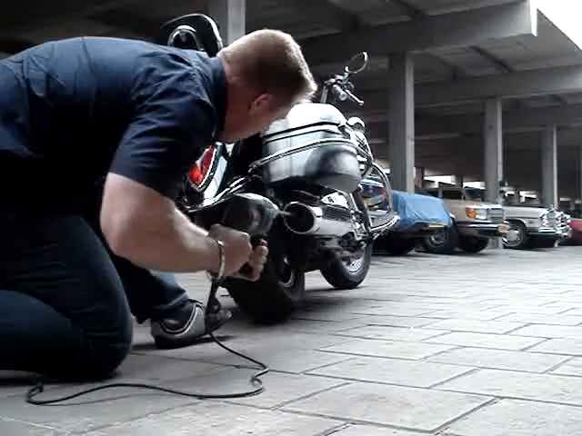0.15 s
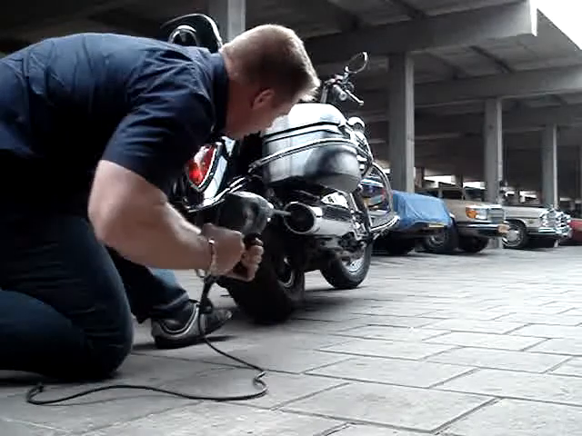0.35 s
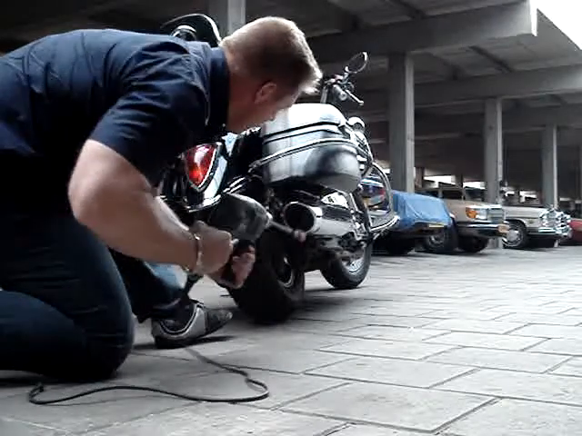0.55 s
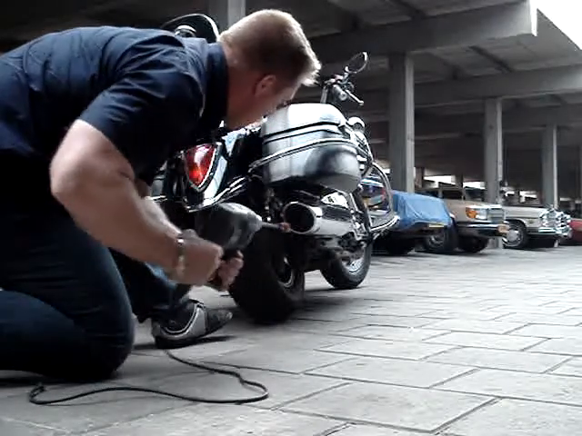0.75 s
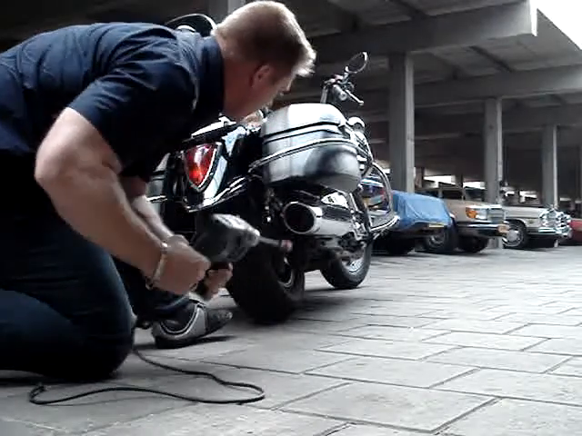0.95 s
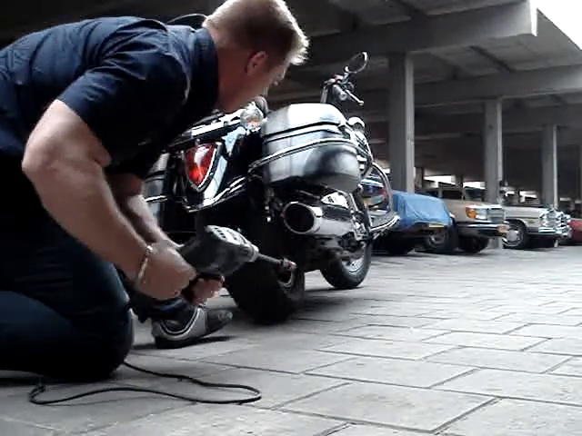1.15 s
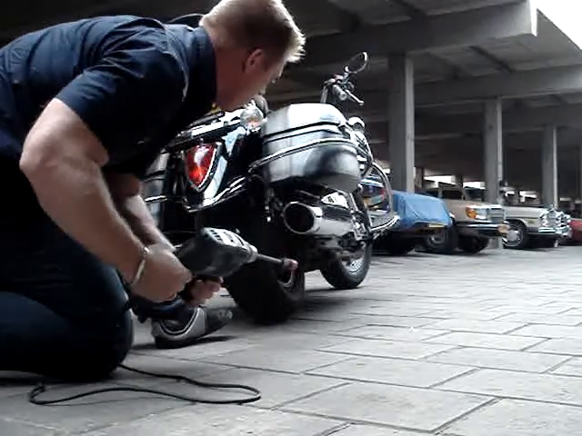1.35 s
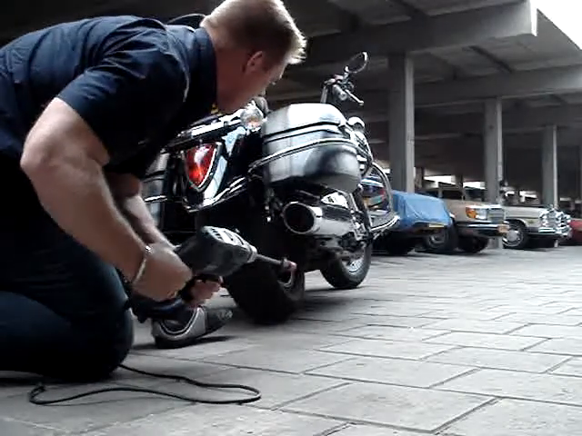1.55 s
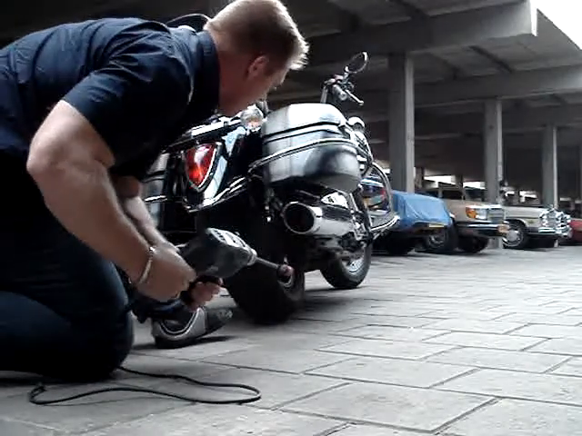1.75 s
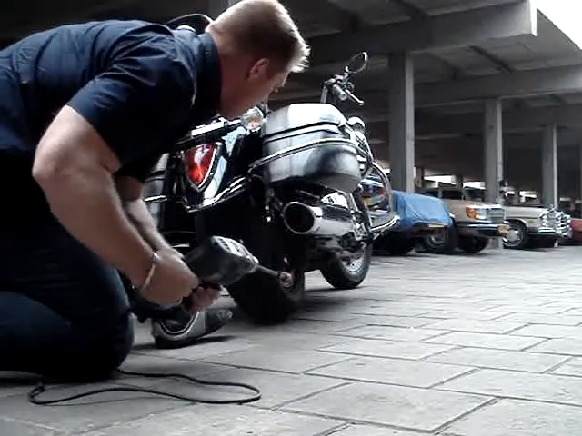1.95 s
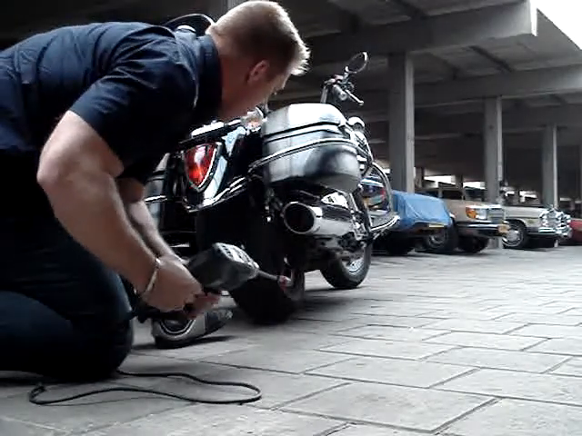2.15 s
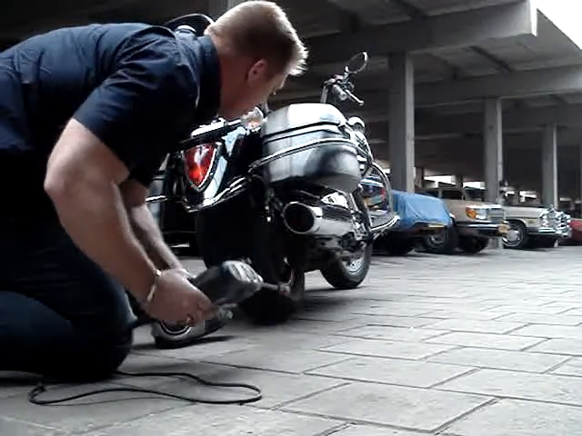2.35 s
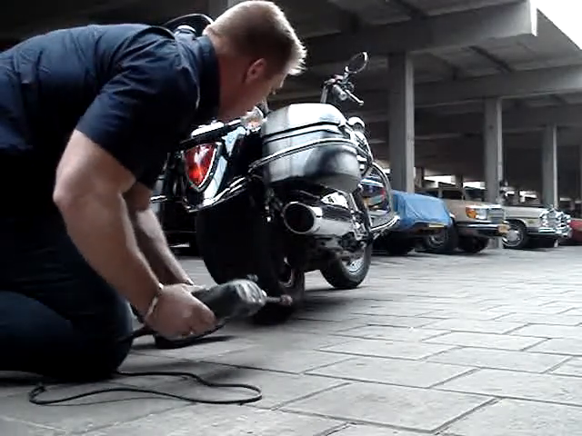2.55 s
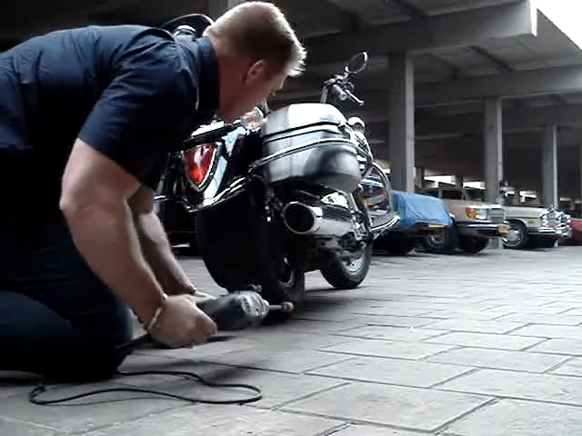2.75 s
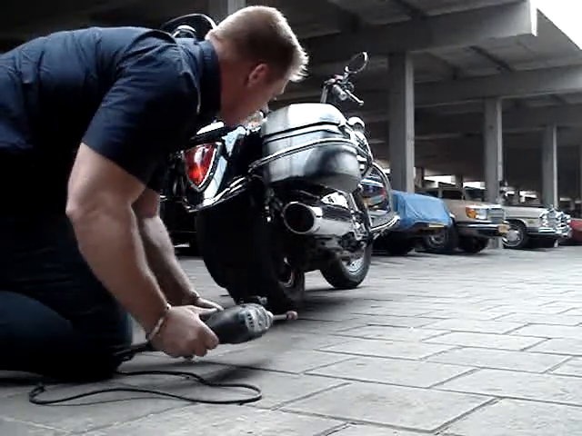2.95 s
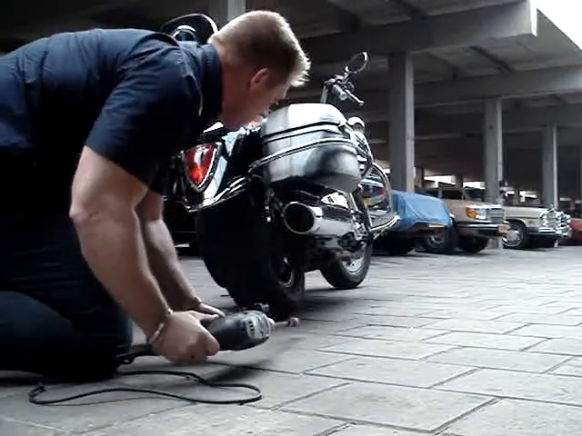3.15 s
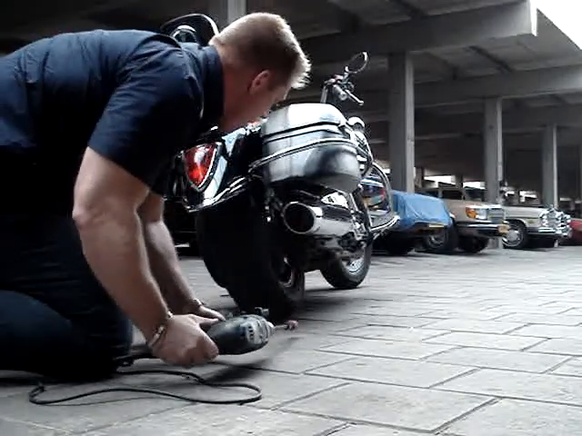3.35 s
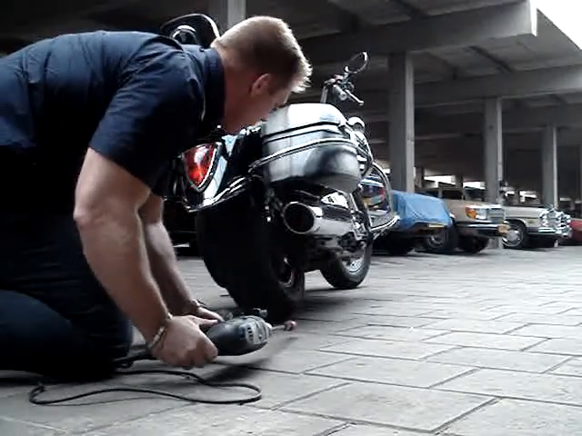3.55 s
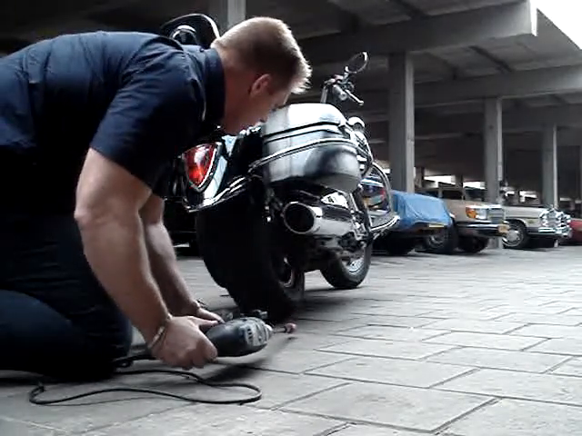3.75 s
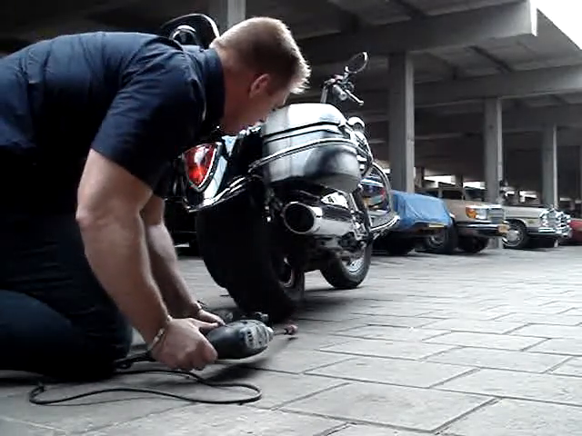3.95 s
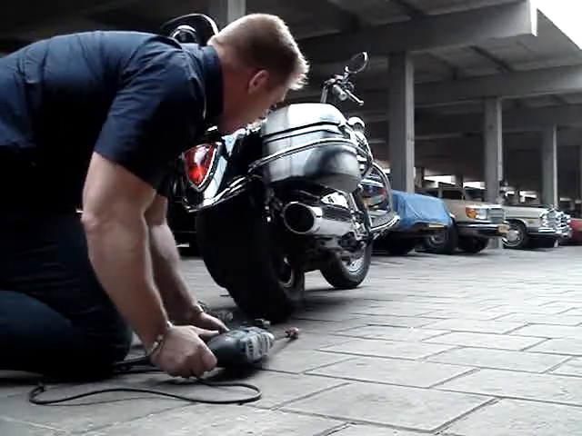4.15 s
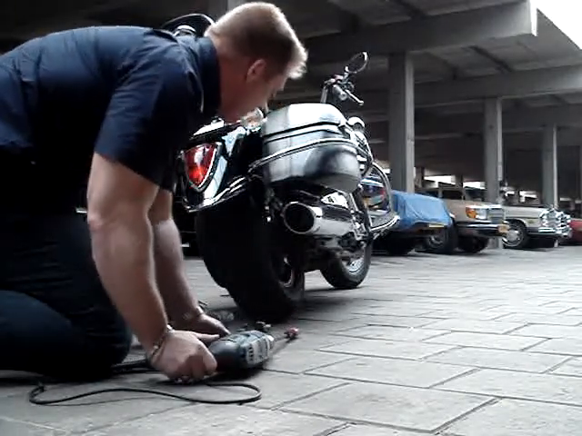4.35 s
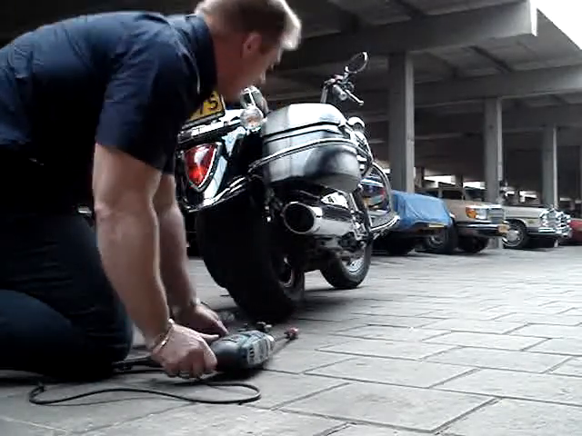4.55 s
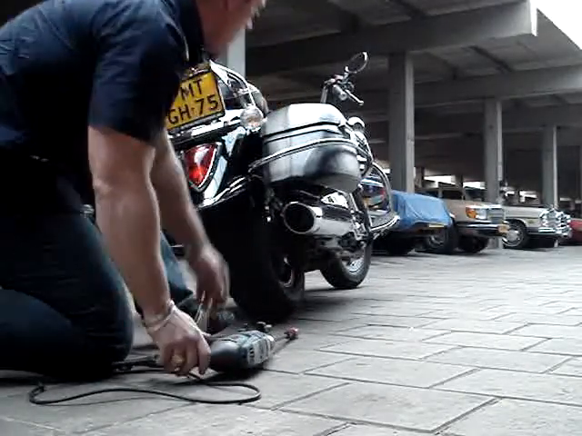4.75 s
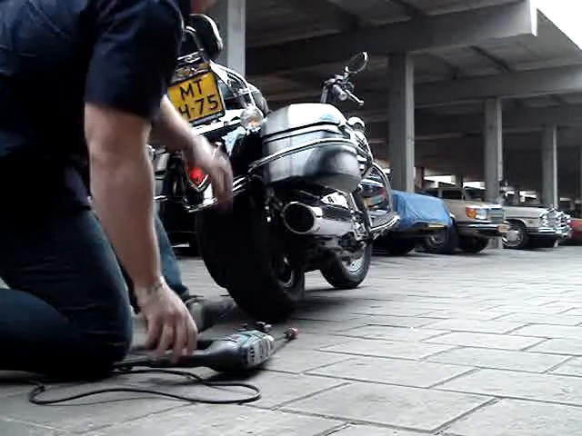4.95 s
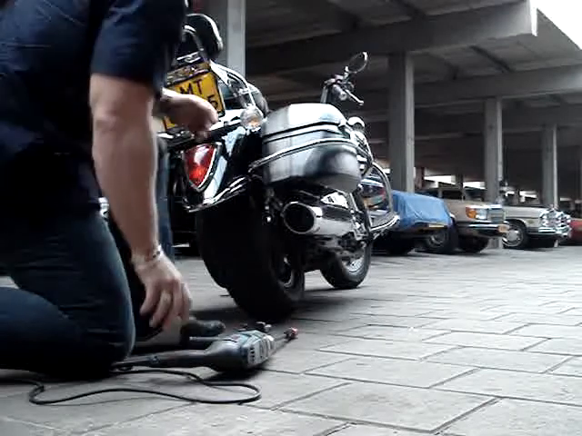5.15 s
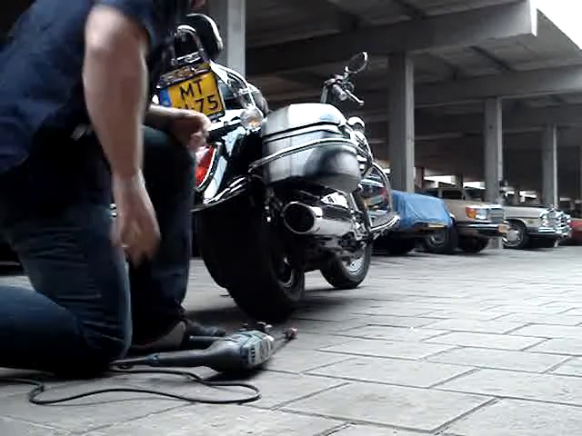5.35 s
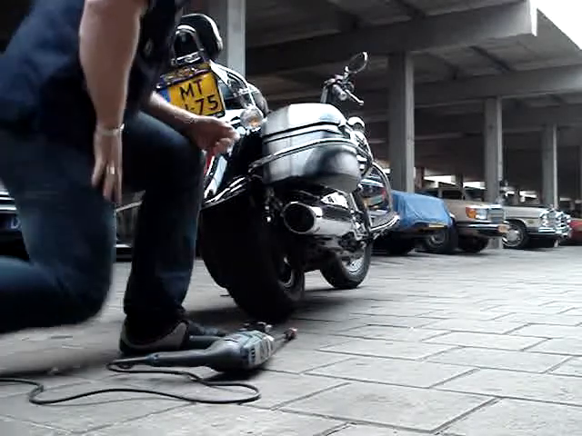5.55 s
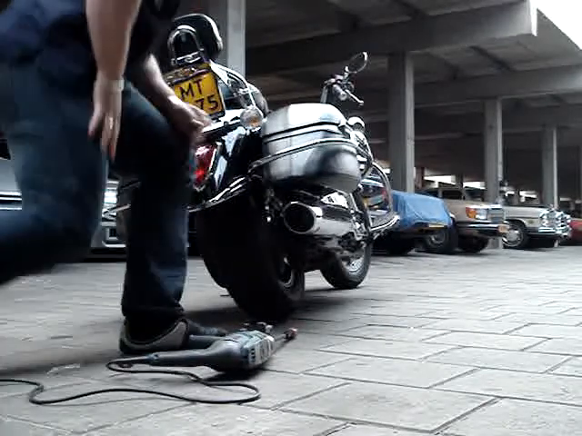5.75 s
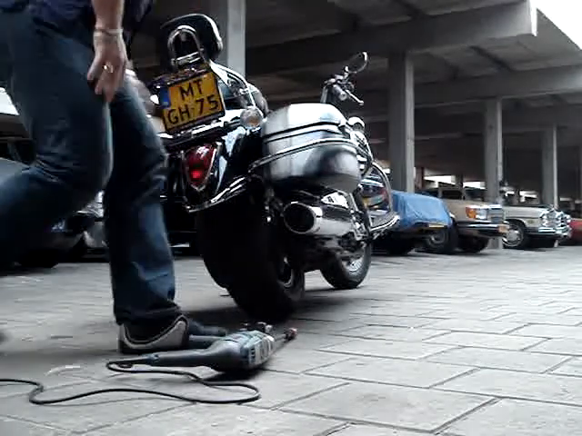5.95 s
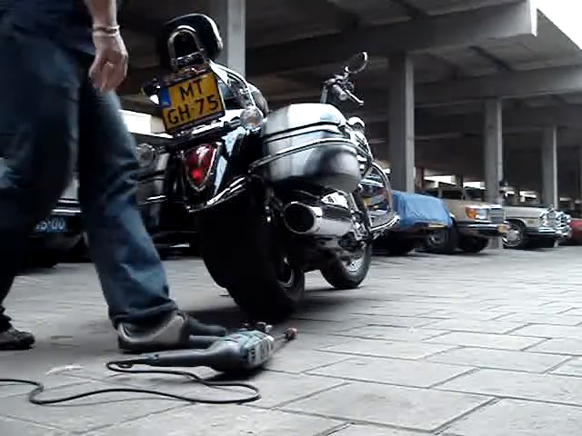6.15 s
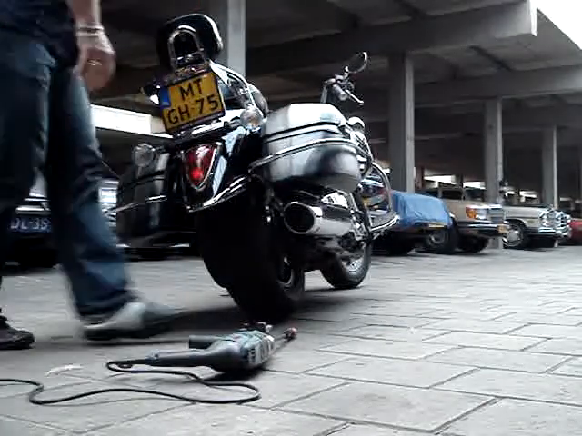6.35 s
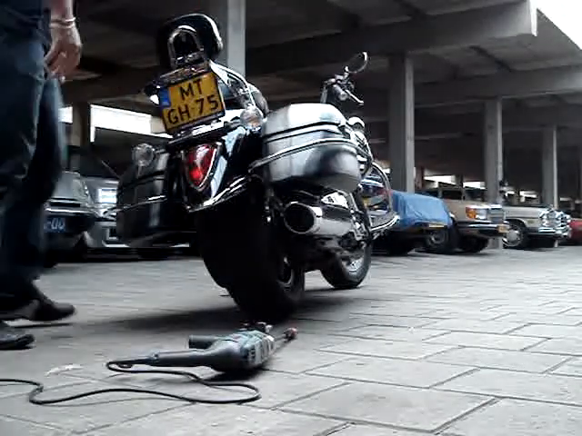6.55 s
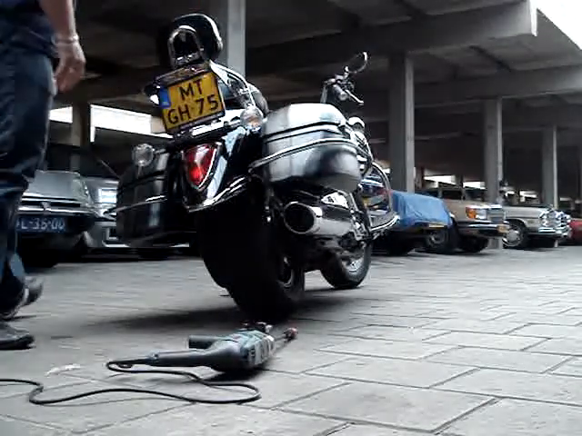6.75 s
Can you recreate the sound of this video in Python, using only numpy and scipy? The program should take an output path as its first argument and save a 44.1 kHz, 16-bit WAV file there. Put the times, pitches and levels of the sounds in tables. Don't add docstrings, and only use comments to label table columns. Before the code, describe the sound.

A loud corded drill rasps inside a steel pipe, knocks free, then whines down to a stop; it is laid on paving and shoes scuff away.

```python
import sys
import numpy as np
from scipy import signal
from scipy.fft import irfft
from scipy.io import wavfile

SR = 44100
rng = np.random.default_rng(int(sys.argv[2]) if len(sys.argv) > 2 else 0)


def unload_wav(signal):
    wavfile.write(
        sys.argv[1],
        SR,
        np.round(np.clip(np.atleast_2d(signal).T, -1, 1) * 32767).astype(np.int16),
    )


def how_loud(loudness_db):
    steps = np.asarray(loudness_db, float) / 20
    return 10 ** steps


N = 300317
T = np.arange(N) / SR

# (multiple of rotor speed, level at 200 turns per s [dB], slope [dB per doubling])
SHAFT_LINES = [(1, -56, 15.5), (6, -46, 12)]
# (multiple of rotor speed, column of FRAME_MODES, level [dB], slope [dB per doubling])
FRAME_LINES = [(24, 2, -4, 7), (36, 2, -10, 6), (48, 3, -3, 8), (72, 3, -4, 7), (96, 3, 1, 9.5),
               (120, 3, 5, 12), (39, 4, 0, 9)]
# (centre [Hz], width [Hz], bars [dB], double bars [dB], fan [dB])
FRAME_MODES = [(850, 490, -35.5, -38, -55), (1370, 470, -30, -27, -40), (1673, 260, -24, -26, -48),
               (1940, 137, -26.5, -43, -53), (2163, 500, -43.5, -24, -39), (3770, 420, -25, -56, -56),
               (4290, 270, -33, -50, -41), (4840, 670, -30, -40, -41), (5350, 330, -38, -40, -37),
               (6100, 550, -35, -46, -33.5), (6510, 280, -33, -30.5, -37.5), (7000, 750, -31, -38.5, -34.5),
               (7950, 350, -67, -65, -32.5), (8740, 1700, -60, -66, -37)]
# (multiple of rotor speed, level over the rattle [dB])
SLOT_LINES = [(12, -9), (18, -11), (30, -10), (60, -5), (84, -3), (108, -6), (132, -5), (144, -4)]
# (time [s], level [dB])
RUN_DOWN = [(0.0, -22), (0.44, -21.5), (0.65, -24.5), (1.41, -24), (2.67, -36.5), (2.82, -38), (3.08, -40),
            (3.45, -49.5), (3.68, -59.5), (3.81, -83), (3.9, -81)]
# (frequency [Hz], level [dB per Hz])
AIR_SPECTRUM = [(35, -37.5), (60, -36), (171, -22), (286, -18), (326, -18), (412, -9), (909, 0), (1690, -2),
                (2010, -3.5), (3740, -2.5), (6800, -8.5), (8980, -21.5), (10000, -37.5), (13000, -50),
                (22000, -120)]
# (centre [Hz], width [Hz], level [dB])
HOUSING_MODES = [(915, 260, -9), (1660, 240, 1), (2150, 330, -2), (2780, 360, -6), (3670, 400, -10),
                 (4980, 500, -11), (6600, 800, -10), (8900, 600, -22)]
# (centre [Hz], width [Hz], level [dB], most fed at time [s])
PIPE_MODES = [(125, 40, -19, .3), (515, 25, -4, .03), (738, 26, -1, .36), (912, 30, -2, .26),
              (1040, 40, -5, .15), (1390, 60, -2, .36), (1680, 70, -7, .12), (2409, 18, 0, .17),
              (2748, 30, -5, .29), (3208, 22, -1, .14), (3381, 30, -6, .3), (3780, 50, -5, .3),
              (4108, 40, -5, .05), (4370, 60, -4, .08), (5550, 90, -4, .39), (6350, 300, -2, .36),
              (6743, 24, 1.5, .09), (6778, 30, 0, .27), (6750, 350, -2, .15), (7200, 400, -3, .33)]
# (time [s], extra level [dB], decay [s])
SNAGS = [
    (0, 5.5, 0.071),
    (0.492, 7, 0.014),
    (.53, -3, 0.024),
]
# (time [s], blow [dB])
PIPE_BLOWS = [
    (.004, -17),
    (.49, -6.5),
    (.507, -7),
    (.53, -5),
    (.545, -32),
]
# (frequency [Hz], level [dB], t60 [s])
PIPE_RING = [(554.5, -12.5, 0.22), (977, -26, 0.27), (2080, -15, 0.076), (2410, -18.5, 1), (3070, -7, 0.03),
             (4080, -8.5, 0.057)]
# (time [s], peak [dB], centre [Hz], breadth [octaves], t60 [s])
KNOCKS = [(3.972, -44, 1890, 0.32, 0.027), (4.132, -37, 1170, 1.05, 0.038),
          (4.272, -40.5, 900, 0.99, 0.033), (4.322, -30, 280, 0.73, 0.015),
          (4.3235, -24.5, 850, 1.87, 0.026), (4.438, -38, 750, 1.6, .04), (5.091, -26, 1020, 0.74, 0.046),
          (5.250, -33, 4400, 0.35, 0.0067), (5.425, -31.5, 3500, 0.56, 0.04), (5.997, -44, 1200, 0.9, .02),
          (6.069, -34, 1090, 0.67, .01), (6.106, -29, 517, 0.65, 0.06), (6.215, -36, 4500, 0.51, .008),
          (6.24, -34, 2800, 0.48, 0.013), (6.417, -35.5, 3920, 0.46, 0.0077)]
# (time [s], blow [dB])
LAID_BLOWS = [
    (4.321, -31),
    (4.345, -53),
    (4.362, -45),
    (4.376, -46),
    (4.393, -45),
    (4.408, -44),
    (4.424, -57),
    (4.44, -42.5),
]
# (frequency [Hz], level [dB], t60 [s])
BODY_RING = [(280, -23, 0.086), (622, -18, 0.075), (870, 0, 0.02), (950, -22, 0.041), (1460, -11.5, 0.033),
             (1900, -25, .08), (5640, -31, 0.19)]
# (start time [s], rise [s], fall [s], peak [dB], tilt: bright half up, dull
# half down [dB])
SCUFFS = [
    (3.05, 0.047, 0.055, -36.5, 7),
    (4.33, 0.0035, 0.12, -48.5, -10),
    (4.438, 0.0042, 0.049, -44.5, -6),
    (5.093, .012, 0.11, -33, -2.5),
    (5.29, 0.022, 0.022, -47, 3),
    (5.415, .01, 0.035, -51, -7),
    (6.108, 0.0023, 0.23, -44.5, -4),
    (6.215, 0.049, 0.14, -39.5, 0.6),
]
# (frequency [Hz], level [dB per Hz])
TOWN_SPECTRUM = [(12, -40), (20, -3.5), (60, -1), (123, 4.5), (430, -1.5), (619, 0), (1010, -7.5),
                 (1160, -6), (2160, -12), (5640, -19), (6950, -23), (7710, -18.5), (10000, -35),
                 (13000, -57), (22000, -120)]
# (frequency [Hz], level [dB rms])
WHINE = [(7553, -92), (7585, -79.5)]

POWERED_HZ, SAG_HZ_PER_S, REST_S = 368, 6, 3.8035
BRUSH_DRAG, BEARING_DRAG, FAN_DRAG = 56.97, .2855, 3e-4
LOADED_DB = -12
FRAME_FLOOR_DB = -55
LOW_DB, TOP_DB, RINGING_DB = (2, 5), (4.5, 7.5), (-8.5, -5.5)
CUT_DB, FREE_S, FREE_DB_PER_S = -27, 0.674, 295
SCRAPE_DB = -14
RISE_DB, FALL_DB = 12, 27
HOLD = 1.4
HALL_T60_S, HALL_DB, HALL_CUT_HZ = 0.62, -14.5, 2780
HUM_DB, HUM_LOW_DB, HUM_TOP_DB = -51.5, -0.94, 5
RUSTLE_S, RUSTLE_WIDTH_S, RUSTLE_DB, RUSTLE_DULL_DB = 5.66, 0.33, 4.5, -2.5
CUTOFF_HZ, TOP_HZ = 10150, 9600


def motor():
    speed, powered = rotor_speed()
    orders_db = line_levels(speed, powered)
    level_db = np.interp(T, *np.transpose(RUN_DOWN))
    low_db, top_db, ringing_db = (np.interp(speed, [0, POWERED_HZ], ends[::-1])
                                  for ends in (LOW_DB, TOP_DB, RINGING_DB))
    turn = 2 * np.pi * np.cumsum(speed) / SR
    running = T < RUN_DOWN[-1][0]
    play = .009 * drift(60)
    tones = 0
    for order, order_db in orders_db.items():
        level = how_loud(order_db + 1 + min(order, 3) * drift(14))
        tones = tones + np.sqrt(2) * level * np.sin(order * (turn + play))
    slots = 0
    for order, order_db in SLOT_LINES:
        audible = order * speed < CUTOFF_HZ
        wobble = 1 + 0.45 * np.cos(turn + order)
        slots = slots + audible * wobble * how_loud(order_db + 2 * drift(9)) * np.sin(order * (turn + play))
    wake = signal.sosfilt(signal.butter(2, 220, fs=SR, output="sos"), rng.standard_normal(N))
    tones = tones + how_loud(orders_db[39] + 1) * rms_one(wake) * np.sin(39.8 * turn)
    shaken = 1 + 0.15 * np.cos(turn)
    air = coloured(AIR_SPECTRUM, patchy_db=1.14, pulse=shaken, low_db=low_db, top_db=top_db)
    teeth = grains(2500 + 20 * speed, spread_db=1.0) * shaken
    flaws = rms_one(irfft(np.exp(2j * np.pi * rng.random(56)), 2048))
    web = np.interp(turn / (2 * np.pi) % 1, np.arange(2048) / 2048, flaws)
    teeth = teeth + how_loud(-3.5) * slots + how_loud(-9 + 3 * drift(8)) * web
    housing = 0
    for k, (hz, width, peak_db) in enumerate(HOUSING_MODES):
        ringing = resonate(resonate(teeth, hz, width), hz, width)
        housing = housing + (-1) ** k * how_loud(peak_db) * ringing / np.sqrt(width)
    slow = np.clip(1 - speed / 300, 0, 1)
    rattle = how_loud(ringing_db - 5 + 8 * slow) * rms_one(housing)
    return running * (tones + how_loud(level_db) * (how_loud(2 - 7 * slow) * air + rattle))


def rotor_speed():
    step, turns = .002, [0.]
    for _ in range(round(REST_S / step)):
        drag = BRUSH_DRAG + BEARING_DRAG * turns[-1] + FAN_DRAG * turns[-1] ** 2
        turns.append(turns[-1] + step * drag)
    coasting = np.interp(REST_S - T, step * np.arange(len(turns)), turns)
    return np.clip(coasting, 1, POWERED_HZ - SAG_HZ_PER_S * T), coasting > POWERED_HZ


def line_levels(speed, powered):
    speed, powered = speed[::64], powered[::64]
    doublings = np.log2(speed / 200)
    levels = {}
    for order, line_db, slope_db in SHAFT_LINES:
        levels[round(order)] = line_db + slope_db * doublings
    for order, column, line_db, slope_db in FRAME_LINES:
        order = round(order)
        gain = how_loud(FRAME_FLOOR_DB)
        for mode in FRAME_MODES:
            off_centre = 2 * (order * speed - mode[0]) / mode[1]
            gain = gain + how_loud(mode[round(column)]) / (1 + off_centre ** 4)
        gain = gain * (order * speed < CUTOFF_HZ)
        levels[order] = 20 * np.log10(gain + 1e-9) + line_db + slope_db * doublings + LOADED_DB * powered
    return {order: np.interp(T, T[::64], level_db) for order, level_db in levels.items()}


def cutting():
    catches = grains(2500 * how_loud(3 * drift(30)), spread_db=3.5)
    pipe = 0
    for hz, width, peak_db, s in PIPE_MODES:
        fed_db = peak_db - 8 * np.tanh(((T - s) / .14) ** 2) + 2.5 * drift(12)
        pipe = pipe + resonate(catches * how_loud(fed_db), hz, width) / np.sqrt(width)
    cutting_now = T < FREE_S + .12
    level_db = CUT_DB - FREE_DB_PER_S * np.maximum(T - FREE_S, 0)
    for s, extra_db, decay in SNAGS:
        level_db = level_db + extra_db * (T >= s) * np.exp(-np.abs(T - s) / decay)
    scrape = how_loud(SCRAPE_DB) * rms_one(band(catches, 950, 6400))
    return how_loud(level_db) * (how_loud(-6.0) * rms_one(pipe * cutting_now) + scrape) * cutting_now


def knocks():
    out, age = np.zeros(N), T[:SR // 8]
    bursts = rng.standard_normal((len(KNOCKS), len(age)))
    for (s, peak_db, hz, octaves, t60), burst in zip(KNOCKS, bursts):
        burst[0] = 4
        half = 2 ** np.clip(octaves, .2, 2.5)
        hit = band(burst * how_loud(-60 * age / t60), hz / half, hz * half)
        at = round(s * SR)
        out[at:at + len(age)] += how_loud(peak_db + 1.0) * hit / np.abs(hit).max()
    laid_down = how_loud(9) * struck(LAID_BLOWS, BODY_RING)
    return out + laid_down + band(struck(PIPE_BLOWS, PIPE_RING), 260, 9500)


def struck(blows, modes):
    clicks, out = np.full(N, 1e-18), 0
    for s, blow_db in blows:
        clicks[round(s * SR)] = how_loud(blow_db)
    for hz, mode_db, t60 in modes:
        r, w = how_loud(-60 / (t60 * SR)), 2 * np.pi * hz / SR
        out = out + how_loud(mode_db) * signal.lfilter([0, np.sin(w)], [1, -2 * r * np.cos(w), r * r], clicks)
    return out


def scuffs():
    grit = grains(5000 * how_loud(3.4 * drift(55)), spread_db=-2.0)
    dull, bright = rms_one(band(grit, 300, 2200)), rms_one(band(grit, 1600, 6300))
    out = 0
    for s, rise, fall, peak_db, tilt_db in SCUFFS:
        swell_db = -RISE_DB * np.clip(1 - (T - s) / rise, 0, 1)
        fade_db = -FALL_DB * np.clip((T - s - rise) / fall, 0, 1) ** HOLD
        inside = (T > s) & (T < s + rise + fall)
        drag = dull * how_loud(-tilt_db) + bright * how_loud(tilt_db)
        out = out + inside * how_loud(peak_db + swell_db + fade_db - 7.5) * drag
    return out


def hall(x):
    age = T[:SR]
    tail = band(rng.standard_normal(SR), 130, HALL_CUT_HZ) * how_loud(-60 * age / HALL_T60_S) * (age > .018)
    return how_loud(HALL_DB) * signal.fftconvolve(x, tail / np.sqrt(np.sum(tail ** 2)))[:N]


def town_hum():
    rustle = np.exp(-((T - RUSTLE_S) / RUSTLE_WIDTH_S) ** 2)
    low_db, top_db = HUM_LOW_DB + RUSTLE_DULL_DB * rustle, HUM_TOP_DB + RUSTLE_DULL_DB * rustle
    hum = coloured(TOWN_SPECTRUM, patchy_db=0.72, low_db=low_db, top_db=top_db)
    return how_loud(HUM_DB + RUSTLE_DB * rustle) * hum


def camera_whine():
    return sum(np.sqrt(2) * how_loud(line_db) * np.sin(2 * np.pi * hz * T) for hz, line_db in WHINE)


def rms_one(x):
    return x / np.sqrt(np.mean(x ** 2) + 1e-20)


def at_hz(points, hz):
    points = np.array(points)
    return np.interp(np.log(hz), np.log(points[:, 0]), points[:, 1])


def drift(rate):
    r = np.exp(-80 * np.pi * rate / SR)
    slow = signal.lfilter([1], [1, -2 * r, r * r], rng.standard_normal(N // 40 + 2002))[2000:]
    return np.interp(np.arange(N) / 40, np.arange(len(slow)), rms_one(slow))


def band(x, low_hz, high_hz):
    return signal.sosfilt(signal.butter(2, [low_hz, min(high_hz, .45 * SR)], "band", fs=SR, output="sos"), x)


def resonate(x, hz, width):
    r = np.exp(-np.pi * width / SR)
    feedback = [1, -2 * r * np.cos(2 * np.pi * hz / SR), r * r]
    return signal.lfilter(np.array([1, 0, -1]) * (1 - r * r) / 2, feedback, x)


def grains(per_s, spread_db):
    sizes = how_loud(spread_db * np.minimum(rng.exponential(1, N), 4)) * rng.choice([-1, 1], N)
    return rms_one(sizes * (rng.random(N) < per_s / SR)) + 1e-18


def coloured(spectrum, patchy_db, pulse=1, low_db=0, top_db=0):
    white = rng.standard_normal((2, N)) * pulse
    together, out, power = drift(3.1), 0, 0
    edges = 20 * 2 ** np.arange(0, 9.4, 1 / 3)
    for k, (low, high) in enumerate(zip(edges, edges[1:])):
        hz = np.sqrt(low * high)
        octaves = np.log2(hz / 1800)
        part = how_loud(at_hz(spectrum, min(hz, TOP_HZ))) * band(white[k % 2], low, high)
        power += np.mean(part ** 2)
        tilt_db = top_db * octaves / 2 if octaves > 0 else -low_db * max(octaves, -2) / 2
        out = out + part * how_loud(tilt_db + patchy_db * (0.24 * together + drift(33.5)))
    return out / np.sqrt(power)


def scene():
    near = motor() + cutting() + knocks() + scuffs()
    mono = near + hall(near) + town_hum() + camera_whine()
    return np.array([mono, mono])


def low_pass(x):
    return signal.sosfilt(signal.butter(12, 10520, fs=SR, output="sos"), x)


def record(dry):
    rounded = .9 * np.tanh(dry / .9)
    cut = signal.sosfilt(signal.ellip(12, .3, 70, CUTOFF_HZ, fs=SR, output="sos"), rounded)
    return low_pass(cut)


dry = scene()
out = record(dry)
unload_wav(out)
```